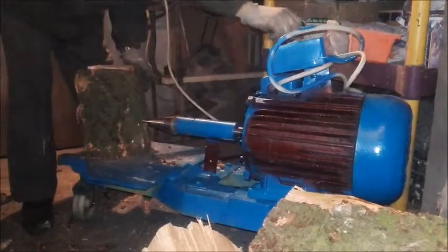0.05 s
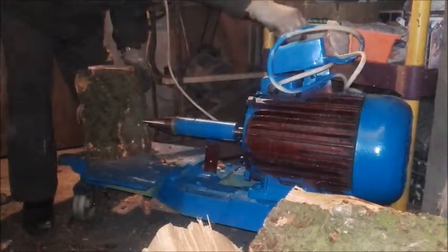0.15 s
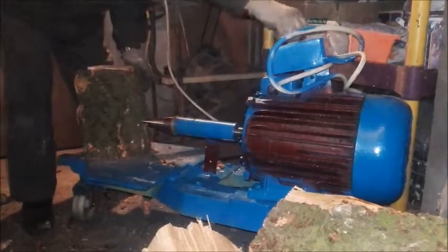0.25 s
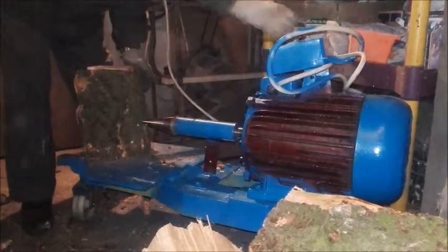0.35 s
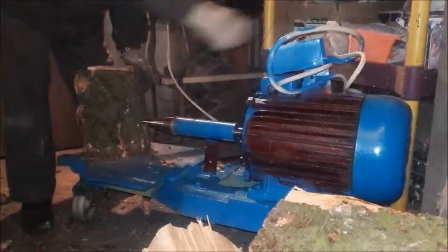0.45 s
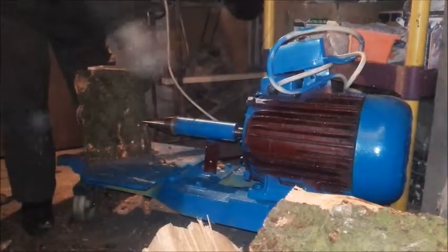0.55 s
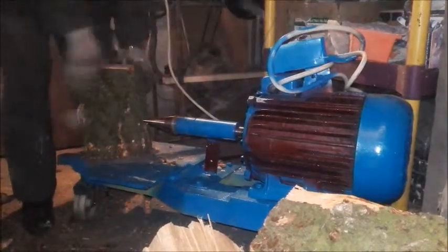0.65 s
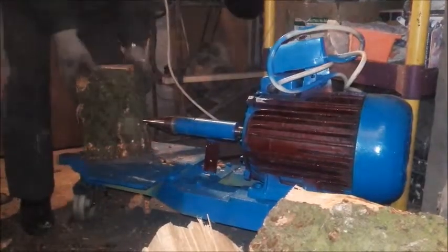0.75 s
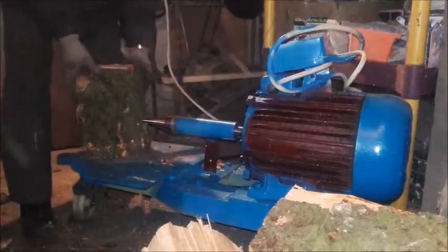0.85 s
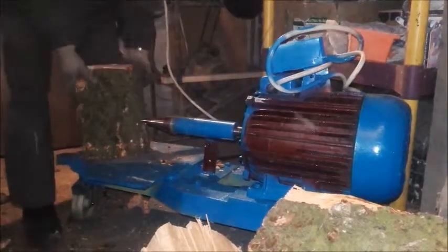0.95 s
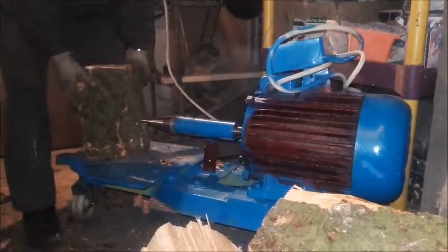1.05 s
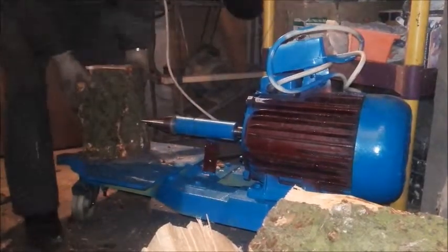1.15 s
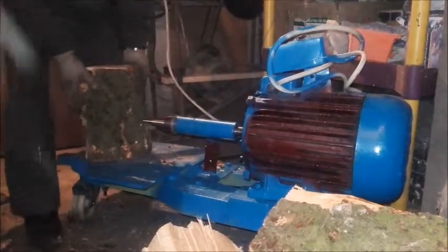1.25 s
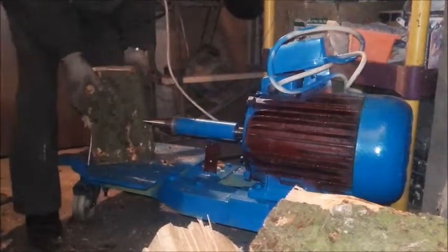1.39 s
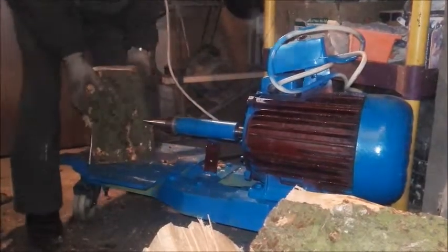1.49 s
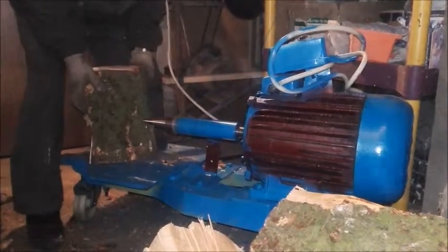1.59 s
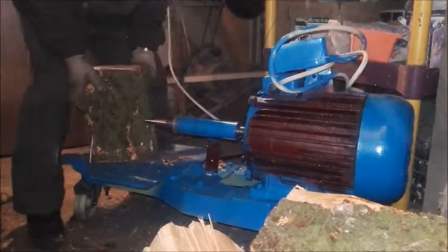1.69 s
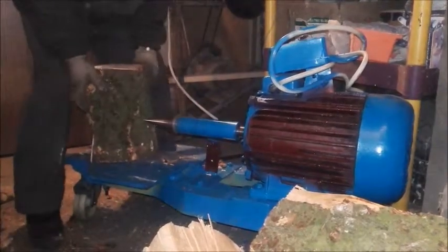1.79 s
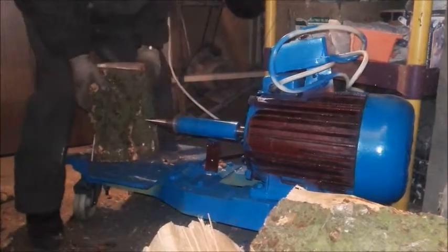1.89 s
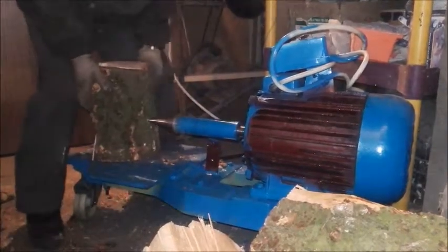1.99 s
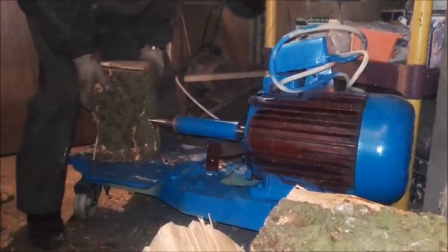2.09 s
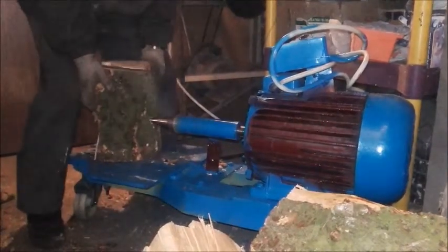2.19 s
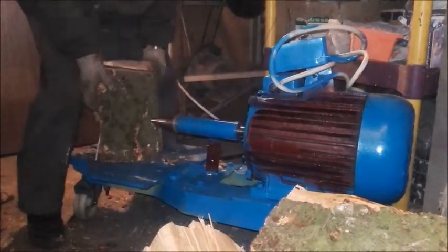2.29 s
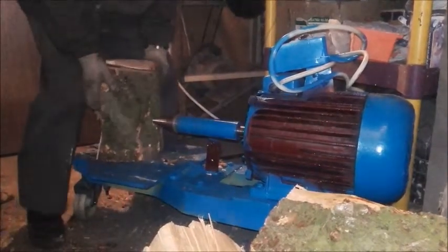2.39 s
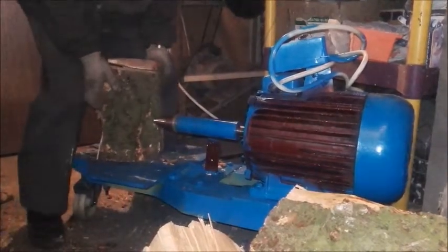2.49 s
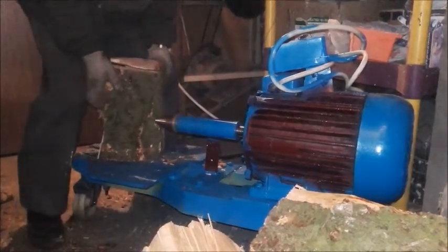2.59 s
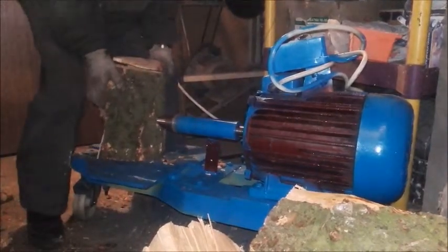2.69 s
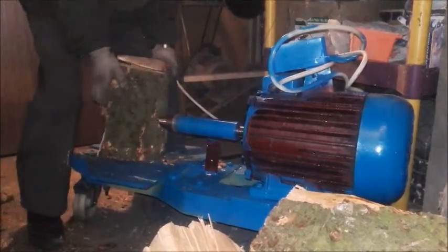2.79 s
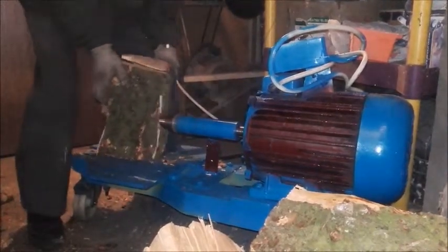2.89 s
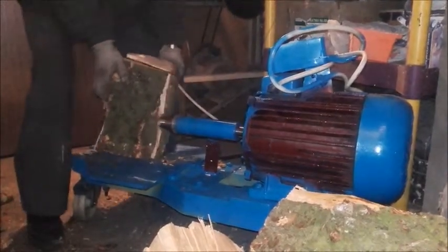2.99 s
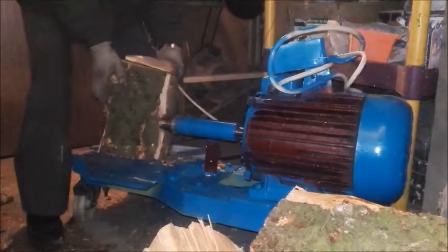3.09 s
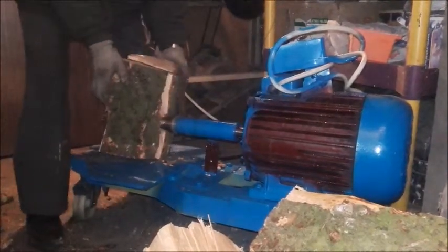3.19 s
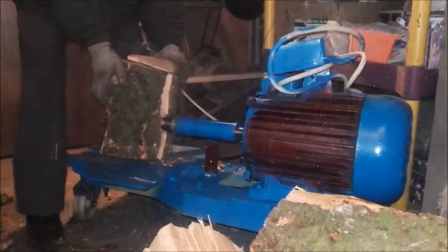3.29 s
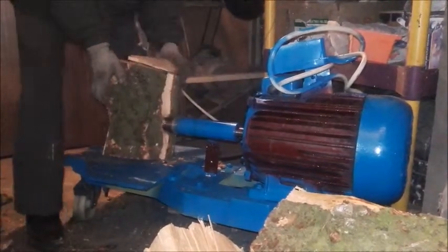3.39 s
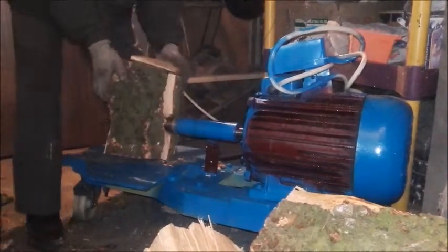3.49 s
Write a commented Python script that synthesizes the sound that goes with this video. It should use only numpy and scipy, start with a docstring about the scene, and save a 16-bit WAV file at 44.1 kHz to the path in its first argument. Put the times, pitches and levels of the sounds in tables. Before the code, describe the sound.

An electric screw log splitter switches on with a clack and a jolt, then hums and whines steadily. Fibres begin ticking, the log tears in two loud crack bursts, and the motor runs on quieter. Close, small shed.

```python
"""An electric screw log splitter in a shed, over quiet air (filtered noise). A button touch and a switch clack
(noise bursts), then starting torque jolts the frame (decaying sines). The motor runs: fluttering hum and whine
partials, bearing and fan rush with resonances, thin screw hiss. A log meets the screw: the whine's balance
shifts, fine crackle and single fibre snaps begin (pulses). The wood tears in two bursts of cracks with body
knocks; last snaps follow and the motor sound carries on at a lower level."""
import sys
import numpy as np
from scipy import signal
from scipy.fft import rfft, irfft
from scipy.io import wavfile
from scipy.ndimage import uniform_filter1d, map_coordinates

SR = 44100
rng = np.random.default_rng(int(sys.argv[2]) if len(sys.argv) > 2 else 0)


def store_pcm(level_fs):
    """Save levels as 16-bit WAV."""
    pcm = np.round(np.clip(level_fs, -1, 1) * 32767).astype(np.int16)
    wavfile.write(sys.argv[1], SR, np.atleast_2d(pcm).T)


N = 156555

SWITCH_S = 0.222
SHAFT_HZ, SHAFT_WOBBLE = 24.8, 0.0011  # mean turns per second, relative rms speed wobble

# spectrum of rush and button: (frequency [Hz], density [dB per Hz])
RUSH_COLOUR = [(30, -39), (58, -43), (75, -25), (110, -18.5), (175, -13.5), (220, -1), (300, -2.5),
               (420, 0), (700, 2), (950, 3), (1200, 0.5), (1540, -2.5), (1870, -1.5), (2020, -2),
               (2450, -1), (3150, -2), (3400, -8), (3800, -20.5), (4600, -27), (5600, -43), (7300, -48.5),
               (8800, -50), (10300, -42.5), (15500, -50)]
# level of whine and housing ringing: (time [s], level [dB])
MOTOR_LEVEL = [(.23, -43), (.29, 4), (.45, -0.5), (.65, 1), (1.5, -0.5), (2.5, 0), (2.7, -7), (3.2, -8),
               (3.55, -9)]


def undb(db):
    """Decibels to amplitude gain."""
    return 10 ** (np.asarray(db) / 20)


def unit(x):
    """Scale to rms 1."""
    return x / np.sqrt(np.mean(np.abs(x) ** 2))


def clock():
    """Time of every sample [s]."""
    return np.arange(N) / SR


def envelope(rows):
    """Gain interpolated in dB between (s, dB) points, -120 dB before the first."""
    s, db = np.array(rows).T
    return undb(np.interp(clock(), s, db, left=-120))


def colour(x, points):
    """Minimum-phase filter of unit energy through (Hz, dB) points."""
    hz, db = np.array(points).T
    size = 4096
    f = np.maximum(np.fft.rfftfreq(size, 1 / SR), 1)
    log_gain = np.log(undb(np.interp(np.log(f), np.log(hz), db)))
    # fold the cepstrum onto positive time: causal response
    cepstrum = irfft(log_gain)
    cepstrum[1:size // 2] *= 2
    cepstrum[size // 2 + 1:] = 0
    response = irfft(np.exp(rfft(cepstrum)))
    return signal.fftconvolve(x, response / np.linalg.norm(response))[:N]


def noise_through(points):
    """White noise coloured by (Hz, dB) points, rms 1."""
    return unit(colour(rng.standard_normal(N), points))


def walk(rate_hz):
    """Smoothed random steps, rms 1."""
    step = int(SR / rate_hz)
    held = np.repeat(rng.standard_normal(N // step + 1), step)
    return unit(uniform_filter1d(held, step)[:N])


def fade(t, t60_s):
    """Exponential decay, 60 dB in t60_s."""
    return np.exp(-np.log(1000) * t / t60_s)


def bursts(rows, t60_s):
    """Pulse plus decaying noise of unit joint energy, scaled, per (s, dB, ringing re pulse dB)."""
    out, t = np.zeros(N + SR), clock()[:SR // 4]
    for s, db, ring_db in rows:
        burst = rng.standard_normal(len(t)) * fade(t, t60_s)
        burst *= undb(ring_db) / np.linalg.norm(burst)
        burst[0] = 1  # the pulse
        i = int(s * SR)
        out[i:i + len(t)] += undb(db) * burst / np.linalg.norm(burst)
    return out[:N]


def crackle(per_s, spread_db):
    """Random clicks of either sign and exponentially spread dB size, rms 1."""
    size = undb(spread_db * np.minimum(rng.exponential(size=N), 4))
    clicks = rng.random(N) < per_s / SR
    return unit(clicks * size * rng.choice([-1, 1], N))


def resonate(x, hz, width_hz):
    """One second-order resonance, gain 1 at its centre."""
    return signal.lfilter(*signal.iirpeak(hz, hz / width_hz, fs=SR), x)


def shaken(noise, rows):
    """Noise through each resonance twice for steep skirts: (Hz, single-pass width Hz, dB)."""
    out = 0
    for hz, width_hz, db in rows:
        once = resonate(noise, hz, width_hz)
        out = out + undb(db) * unit(resonate(once, hz, width_hz))
    return out


def whine(turns):
    """Hum and whine partials locked to the shaft, fluttering; balance shifts as log meets screw."""
    # (frequency at mean speed [Hz], level running free [dB], level with log on screw [dB])
    partials = [(124.3, -57, -57), (248.5, -48.5, -45.5), (571, -44, -50), (797, -54, -45),
                (899.2, -48, -39), (925.5, -43, -44), (1028.5, -44, -47), (1308, -48, -48),
                (1364, -49, -46), (1465, -47, -45), (1609, -42, -46), (1634, -37, -38), (1659, -36, -39),
                (1717.5, -45, -45), (1768, -40, -43), (2070, -47, -45), (2130, -49, -47), (2179, -43, -38),
                (2917, -50, -49), (7101, -83, -85), (9798, -70, -72)]
    contact_mid_s, contact_fade_s = 1.53, 0.71
    rough, flutter_hz = 0.18, 11  # random share of power, step rate
    contact = np.clip((clock() - contact_mid_s) / contact_fade_s + .5, 0, 1)
    out = 0
    for hz, free_db, loaded_db in partials:
        random_part = walk(flutter_hz) + 1j * walk(flutter_hz)
        flutter = np.sqrt(2 * (1 - rough)) + np.sqrt(rough) * random_part
        cycles = hz * turns / SHAFT_HZ + rng.random()
        tone = np.real(flutter * np.exp(2j * np.pi * cycles))
        out = out + undb(free_db + contact * (loaded_db - free_db)) * tone
    return out * envelope(MOTOR_LEVEL)


def rush(turns):
    """Bearing and fan noise, partly repeating each turn, plus noise-shaken frame and housing modes."""
    # rush: (time [s], level [dB])
    rush_level = [(.221, -47.5), (.245, -36), (.256, -21.5), (.275, -19.5), (.32, -19.5), (.4, -26.5),
                  (.6, -28), (1.5, -29), (2.45, -28.5), (2.78, -29), (2.9, -26), (3.2, -34), (3.55, -34)]
    # frame resonances: (frequency [Hz], width [Hz], level [dB])
    drone = [(487, 63, -36), (555.6, 20, -37)]
    # frame drone: (time [s], level [dB])
    drone_level = [(.22, -51), (.26, -14), (.42, -1), (.7, -2.5), (1.4, -1.5), (1.7, -10), (2.7, -7.5),
                   (3.2, -13.5), (3.55, -34)]
    # motor housing resonances: (frequency [Hz], width [Hz], level [dB])
    housing = [(1036, 90, -42), (1646, 58, -36.5), (1726, 37, -42), (2100, 93, -40.5), (2185, 28, -43.5),
               (3196, 65, -50.5)]
    repeat_share = 0.1  # of noise power
    turn = rng.standard_normal(int(SR / SHAFT_HZ))
    repeating = unit(map_coordinates(turn, [turns % 1 * len(turn)], mode="grid-wrap"))
    noise = np.sqrt(repeat_share) * repeating + np.sqrt(1 - repeat_share) * rng.standard_normal(N)
    shake = rng.standard_normal(N)
    frame_ring = shaken(shake, drone) * envelope(drone_level)
    housing_ring = shaken(shake, housing) * envelope(MOTOR_LEVEL)
    return unit(colour(noise, RUSH_COLOUR)) * envelope(rush_level) + frame_ring + housing_ring


def start():
    """Button and switch as noise bursts; starting torque rings the frame's decaying sine modes."""
    # frame modes: (frequency [Hz], level [dB], t60 [s])
    frame_modes = [(492, 3, 0.3), (525, -4, .3), (556, -9, 0.48), (617, -8.5, 0.45), (689, -10, 0.86),
                   (406, -25, 0.09)]
    # starting torque jolts: (time [s], level [dB])
    jolts = [(0.2317, -28.5), (0.2442, -9.5)]
    # switch spectrum: (frequency [Hz], density [dB per Hz])
    switch_colour = [(60, -33), (450, 10), (2700, -8), (4500, -26), (6500, -35), (8700, -15), (9600, -20),
                     (15000, -25)]
    push_s = 0.007  # time constant of the jolt's onset
    frame = 0
    for s, jolt_db in jolts:
        t = np.maximum(clock() - s, 0)
        ring = 0
        for hz, db, t60_s in frame_modes:
            ring = ring + undb(db) * np.sin(2 * np.pi * hz * t) * fade(t, t60_s)
        frame = frame + undb(jolt_db) * ring * (1 - np.exp(-t / push_s))
    button = colour(bursts([(.13, -35, 15)], t60_s=.09), RUSH_COLOUR)
    switch = colour(bursts([(SWITCH_S, -12.5, 15)], t60_s=.16), switch_colour)
    return button + switch + frame


def cracking():
    """Crack bursts and tearing-fibre crackle, which also ring the log's resonances."""
    # cracks: (time [s], level before common gain [dB], ringing re pulse [dB])
    crack_rows = [(2.7955, -11.5, 10), (2.7995, -10, 3), (2.8228, -2.5, 10), (2.8255, -3.5, 9),
                  (2.8295, -1.5, 6), (2.8355, -3.5, 18), (2.8415, -3.5, 19), (2.8445, -1.5, 1),
                  (2.849, -5, -3), (2.852, -4, 19), (2.858, -6, 3), (2.862, -5, 16), (2.8818, -6, 0),
                  (2.9005, -16, 4), (2.9228, -3.5, -3), (2.9505, -7, -16), (2.979, -6.5, -12),
                  (2.9815, -1.5, 2), (2.9873, -2, 0.5), (3.003, -6, 7), (3.0095, -1, -5), (3.012, -1.5, -3),
                  (3.0198, -3, 3), (3.028, -6, 11), (3.035, -10, 6), (3.052, -5.5, 24), (3.0888, -6, 9),
                  (3.1, -19, 17), (3.139, -14.5, 6), (3.2605, -13.5, 7)]
    # tearing fibres: (time [s], level [dB])
    tear_level = [(2.6, -60), (2.78, -40), (2.818, -39), (2.832, -25), (2.86, -26), (2.88, -26.5),
                  (2.9, -25), (2.916, -34), (2.935, -29), (2.97, -25), (3.015, -27), (3.07, -35),
                  (3.095, -23.5), (3.13, -43), (3.2, -58), (3.27, -45), (3.36, -56)]
    # cracking wood spectrum: (frequency [Hz], density [dB per Hz])
    wood_colour = [(30, -60), (80, -36), (150, -38), (300, -12.5), (550, -11.5), (780, -1.5), (1300, -3.5),
                   (2000, 1.5), (3000, -0.5), (3800, -16.5), (5000, -18), (7000, -35.5), (8600, -28),
                   (10500, -22), (15500, -32)]
    # log modes: (frequency [Hz], t60 [s], level before common gain [dB])
    log_modes = [(715, .1, -1), (765, .08, -1), (860, .06, -1), (957, .08, -1), (1048, .08, -1),
                 (1499, .06, -4), (1821, .06, -3), (2137, .05, -3), (2503, .05, -2), (2638, .05, -2),
                 (2718, .05, -3)]
    crack_gain_db, mode_gain_db = 12.5, -2
    cracks = undb(crack_gain_db) * bursts(crack_rows, t60_s=.029)
    tear = crackle(per_s=600, spread_db=3) * envelope(tear_level)
    wood = colour(cracks + tear, wood_colour)
    body = 0
    for hz, t60_s, db in log_modes:
        width_hz = np.log(1000) / (np.pi * t60_s)
        body = body + undb(db + mode_gain_db) * resonate(wood, hz, width_hz)
    return wood + body


def snapping():
    """Single fibres and splinters as short bursts, the biting screw as fine crackle."""
    # snaps: (time [s], level before common gain [dB])
    snap_rows = [(2.169, -25), (2.278, -22.5), (2.384, -23), (2.433, -21), (2.463, -17), (2.476, -15),
                 (2.51, -16.5), (2.57, -20), (2.62, -18), (2.633, -17), (2.685, -18), (2.72, -18),
                 (2.76, -13.5), (2.78, -20), (2.798, -4), (2.845, -7), (2.9005, -31), (3.2605, -6.5),
                 (3.266, -10), (3.3057, -13), (3.318, -16), (3.387, -25), (3.463, -22.5)]
    # screw biting: (time [s], level [dB])
    bite_level = [(1.9, -70), (2.3, -50.5), (2.6, -45.5), (2.78, -36), (2.95, -30.5), (3.09, -34),
                  (3.19, -50), (3.33, -39.5), (3.38, -49.5), (3.55, -51)]
    # snap and bite spectrum: (frequency [Hz], density [dB per Hz])
    snap_colour = [(30, -45), (100, -15), (700, 3.5), (2700, 13), (4000, -3), (7000, -14), (8600, -10),
                   (10500, 0.5), (15500, -12.5)]
    snap_gain_db, ring_db = 6.5, 7
    snaps = undb(snap_gain_db) * bursts([(s, db, ring_db) for s, db in snap_rows], t60_s=.031)
    bite = crackle(per_s=1500, spread_db=1.5) * envelope(bite_level)
    return colour(snaps + bite, snap_colour)


def knocking():
    """Low-mid noise bursts of the log's body as it gives way."""
    # knocks: (time [s], level before common gain [dB])
    knock_rows = [(2.837, -2.5), (2.85, 3), (2.885, -1), (3.014, -7)]
    # knock spectrum: (frequency [Hz], density [dB per Hz])
    knock_colour = [(30, -48), (70, -51), (200, -28), (350, 4.5), (560, 0.5), (800, -1.5), (1150, 2),
                    (1700, 0.5), (3500, -50), (9000, -74)]
    knock_gain_db, ring_db = 8.5, 4.5
    knocks = undb(knock_gain_db) * bursts([(s, db, ring_db) for s, db in knock_rows], t60_s=.12)
    return colour(knocks, knock_colour)


def shed(x):
    """Direct sound plus a short diffuse noise tail from the walls."""
    t60_s, tail_db, delay_s = 0.16, -8.5, 0.008
    t = clock()[:SR // 2]
    tail = rng.standard_normal(len(t)) * fade(t, t60_s) * (t > delay_s)
    return x + undb(tail_db) * signal.fftconvolve(x, tail / np.linalg.norm(tail))[:N]


def hiss():
    """Thin high noise of the spinning screw, fading in at the switch and flickering slightly."""
    # hiss spectrum: (frequency [Hz], density [dB per Hz])
    hiss_colour = [(2000, -29), (7500, -11), (8800, -6), (10000, 0), (12600, -5), (13400, -7),
                   (15800, -8.5)]
    level_db, flicker_db, flicker_hz, rise_s = -62.5, 2.2, 13, 0.05
    running = np.clip((clock() - SWITCH_S) / rise_s, 0, 1)
    gain = undb(level_db + flicker_db * walk(flicker_hz))
    return running * gain * noise_through(hiss_colour)


def air():
    """Quiet air of the shed: steady coloured noise."""
    # air spectrum: (frequency [Hz], density [dB per Hz])
    air_colour = [(30, -16), (100, -3), (250, -9), (400, 0), (600, -6.5), (1900, -7.5), (3000, -11),
                  (4000, -20), (6500, -28), (10500, -18), (15000, -26)]
    level_db = -67
    return undb(level_db) * noise_through(air_colour)


def scene():
    """Motor on one wobbling shaft and the log in the shed, over hiss and air."""
    turns = np.cumsum(SHAFT_HZ * (1 + SHAFT_WOBBLE * walk(3))) / SR
    motor = whine(turns) + rush(turns) + start()
    log = shed(cracking() + snapping() + knocking())
    return (motor + log + hiss() + air())[None]


def record(dry):
    """Clip at full scale, then low-pass steeply."""
    top_hz = 15900
    lowpass = signal.ellip(10, .2, 80, top_hz, fs=SR, output="sos")  # 0.2 dB ripple, 80 dB stop
    return signal.sosfilt(lowpass, np.clip(dry, -1, 1))


dry = scene()
out = record(dry)
store_pcm(out)
```